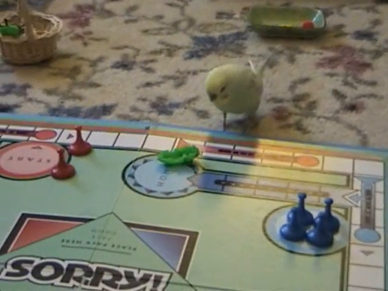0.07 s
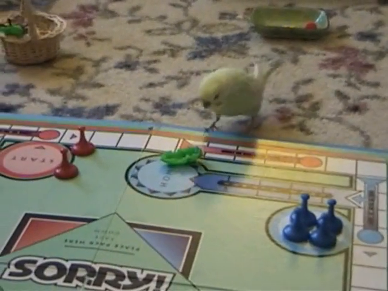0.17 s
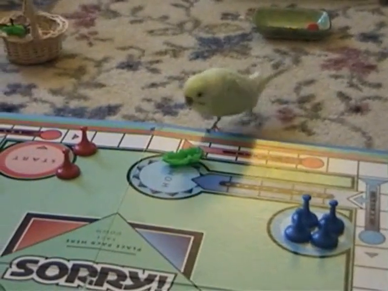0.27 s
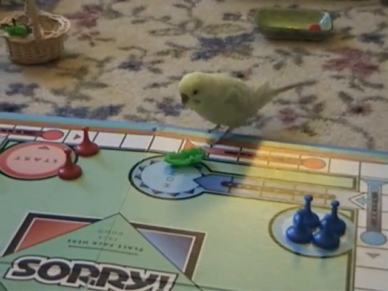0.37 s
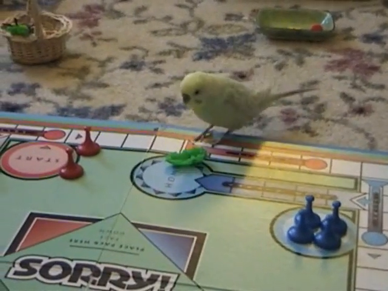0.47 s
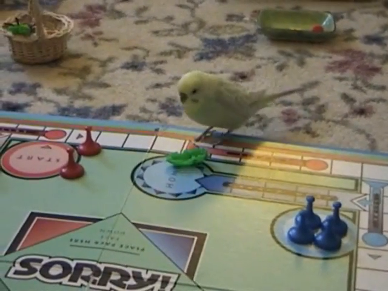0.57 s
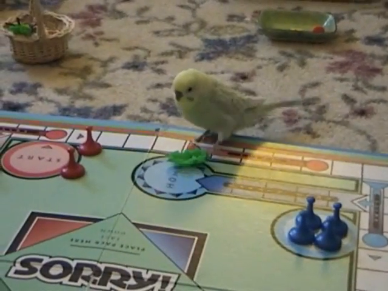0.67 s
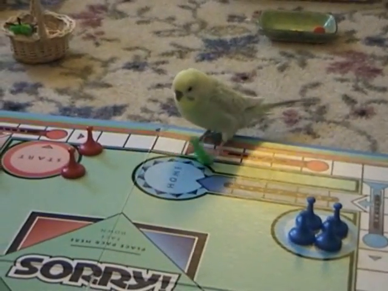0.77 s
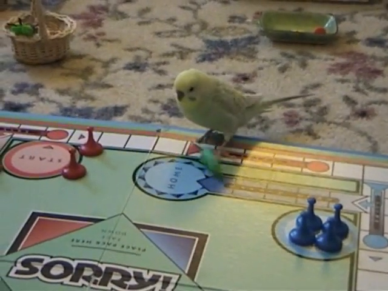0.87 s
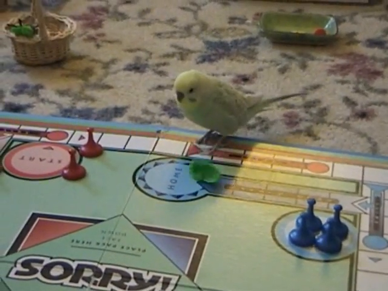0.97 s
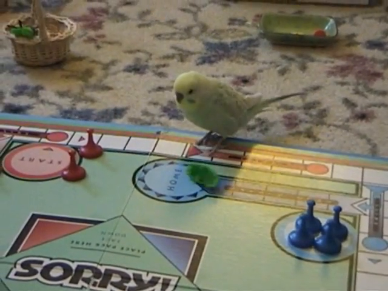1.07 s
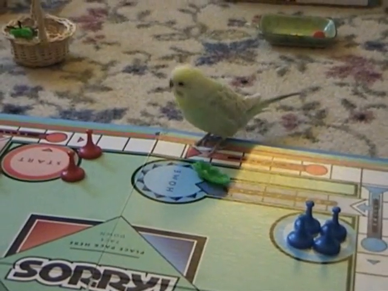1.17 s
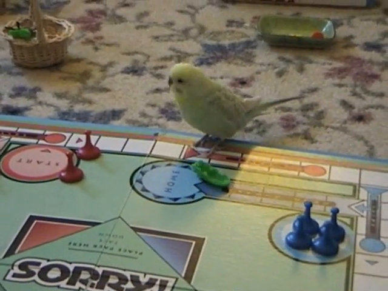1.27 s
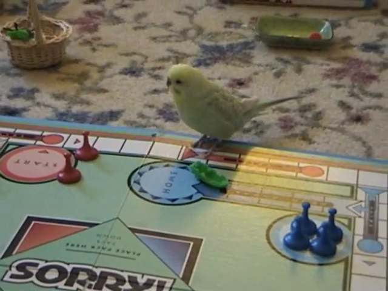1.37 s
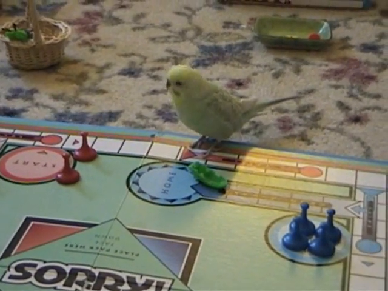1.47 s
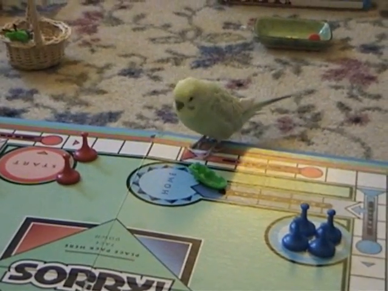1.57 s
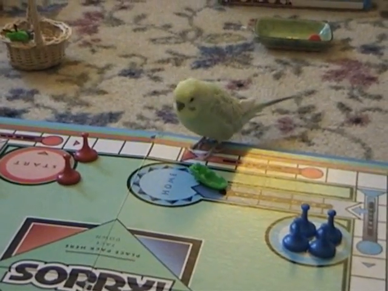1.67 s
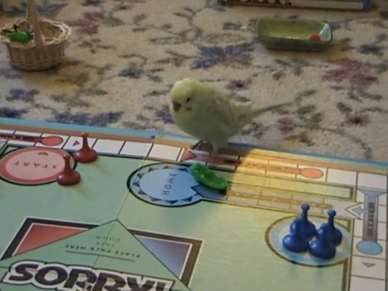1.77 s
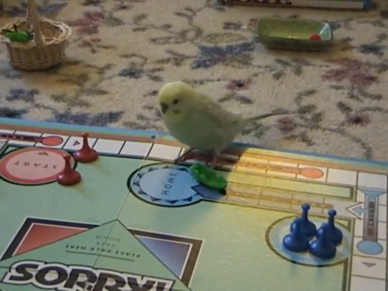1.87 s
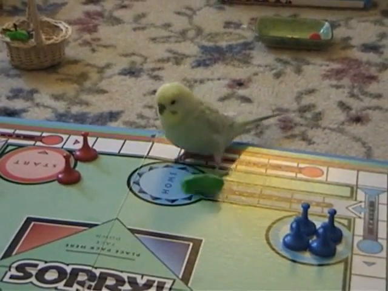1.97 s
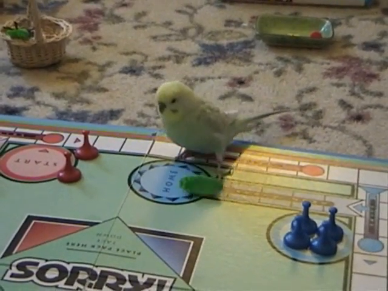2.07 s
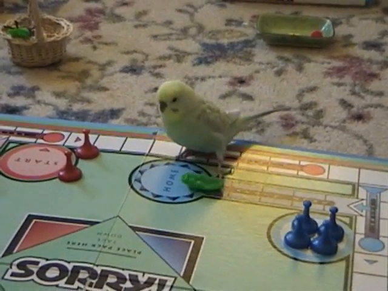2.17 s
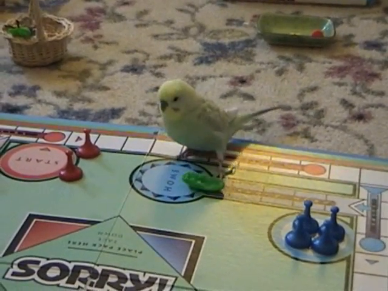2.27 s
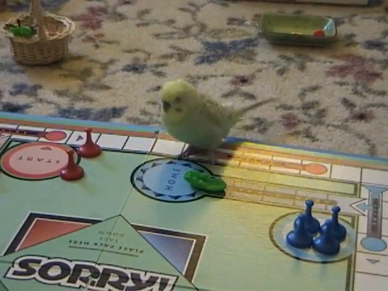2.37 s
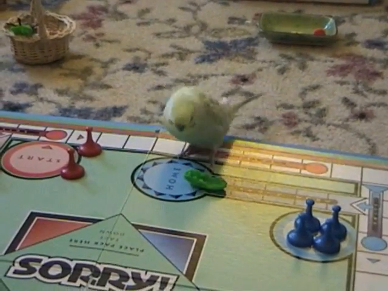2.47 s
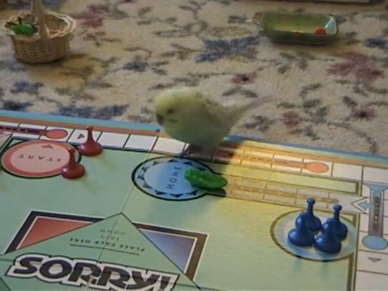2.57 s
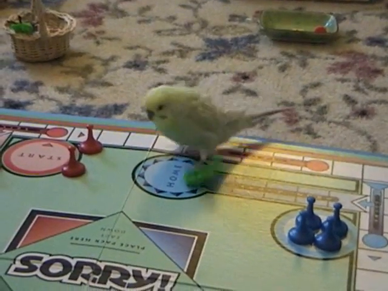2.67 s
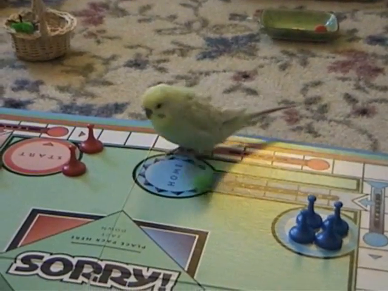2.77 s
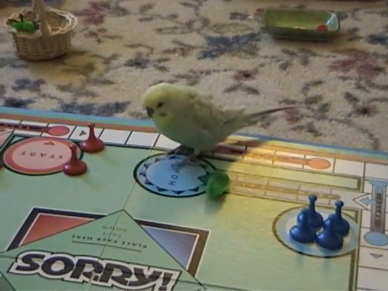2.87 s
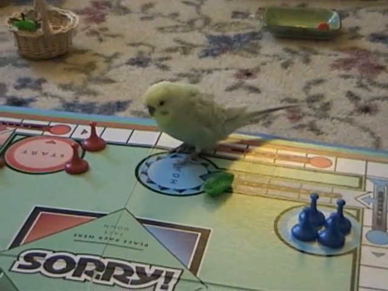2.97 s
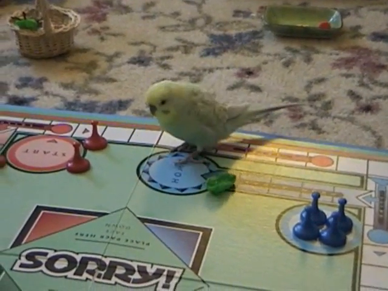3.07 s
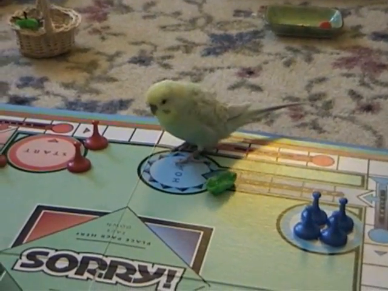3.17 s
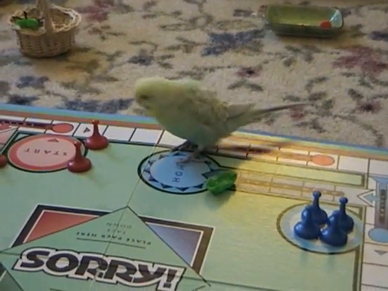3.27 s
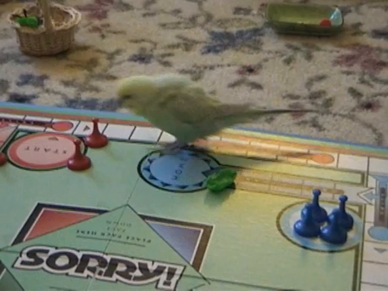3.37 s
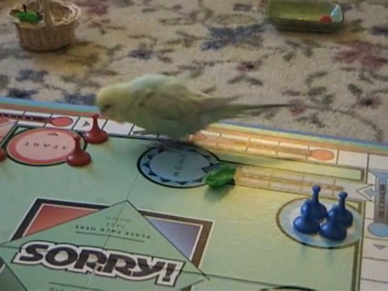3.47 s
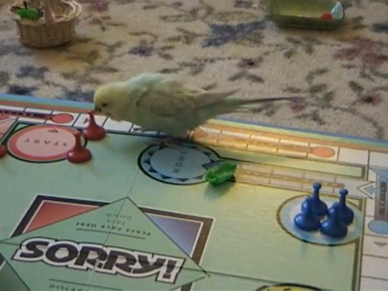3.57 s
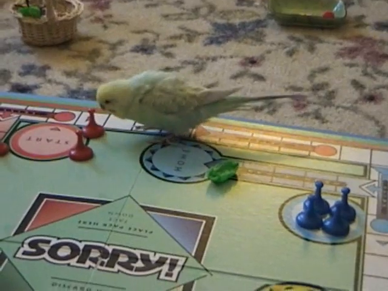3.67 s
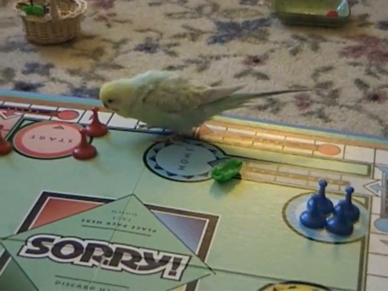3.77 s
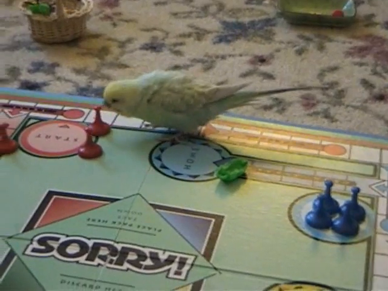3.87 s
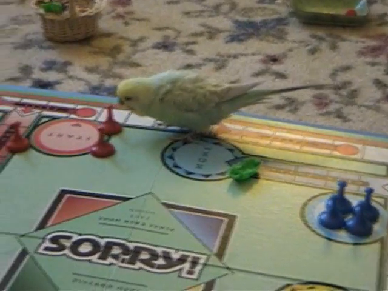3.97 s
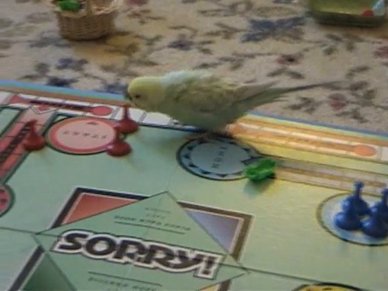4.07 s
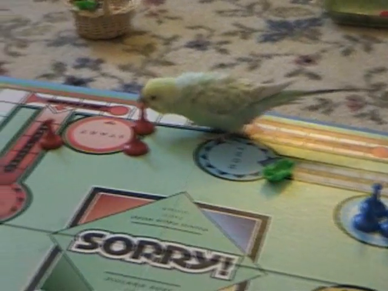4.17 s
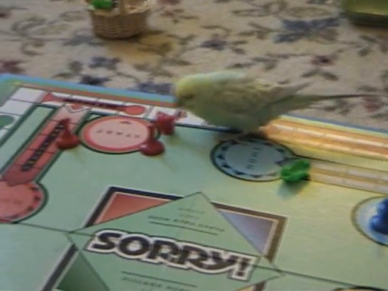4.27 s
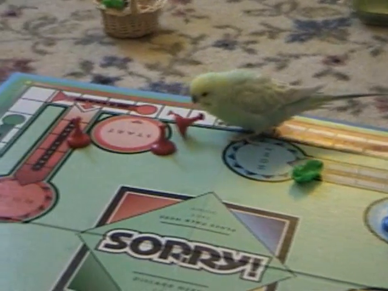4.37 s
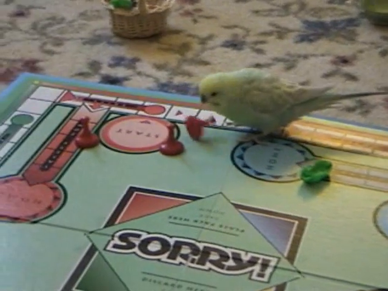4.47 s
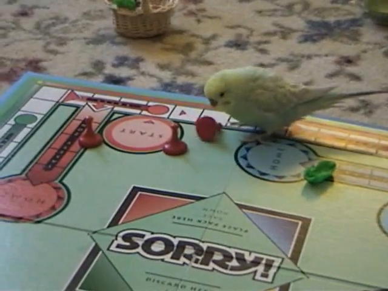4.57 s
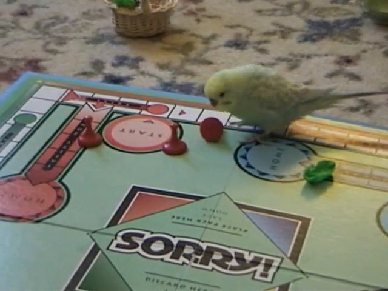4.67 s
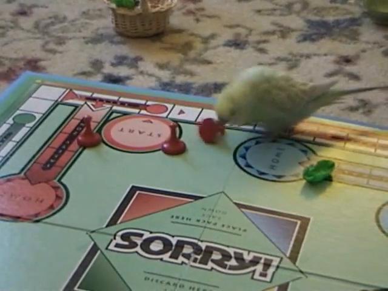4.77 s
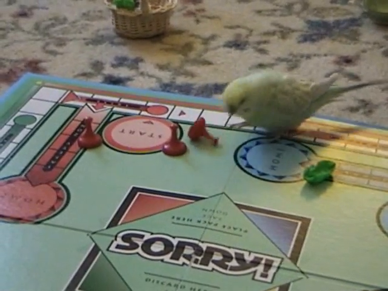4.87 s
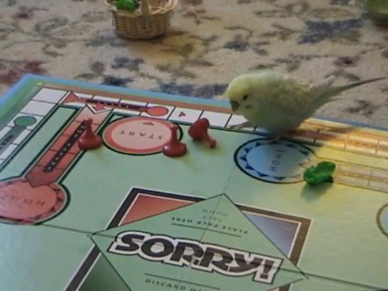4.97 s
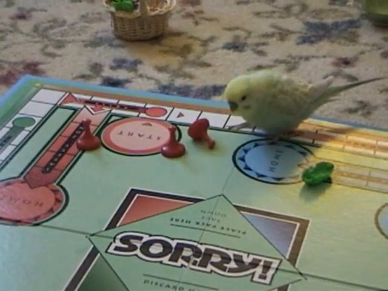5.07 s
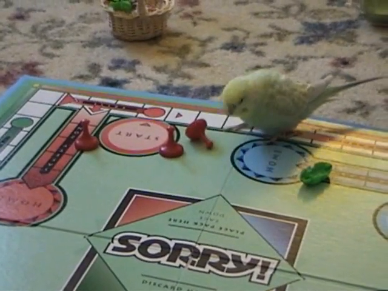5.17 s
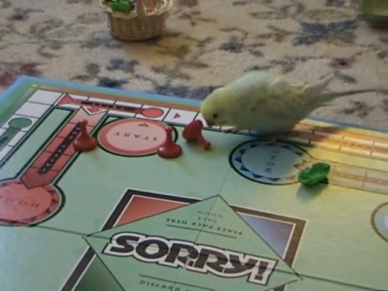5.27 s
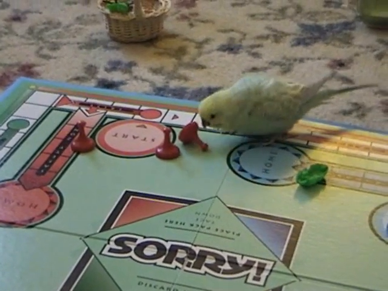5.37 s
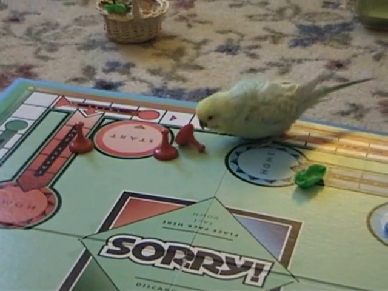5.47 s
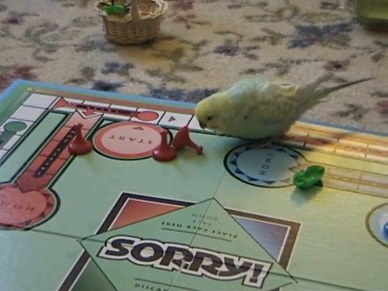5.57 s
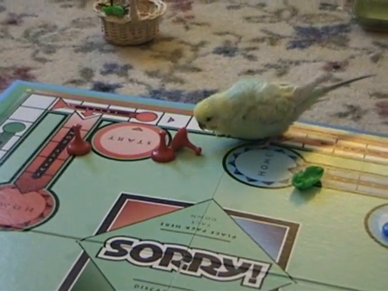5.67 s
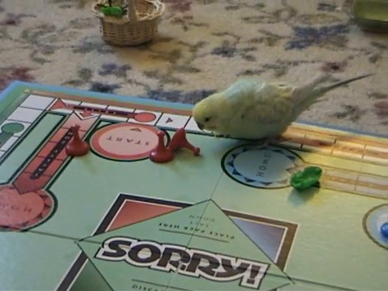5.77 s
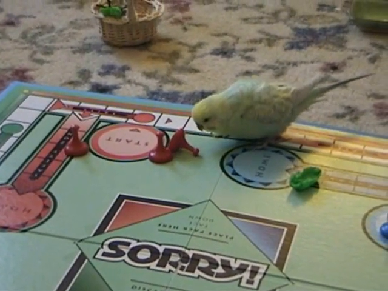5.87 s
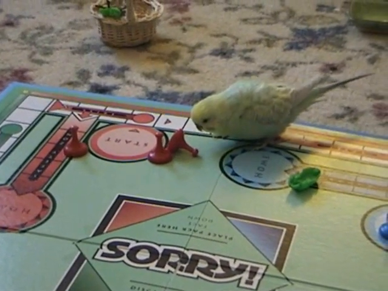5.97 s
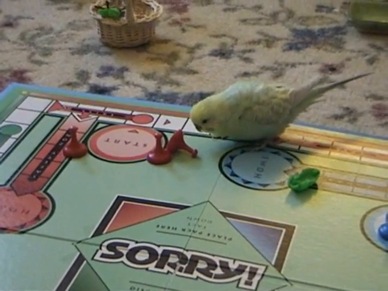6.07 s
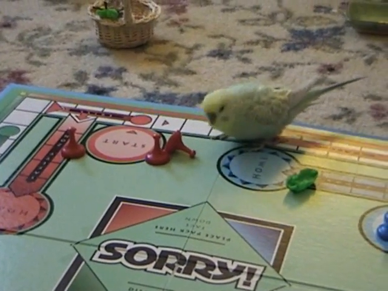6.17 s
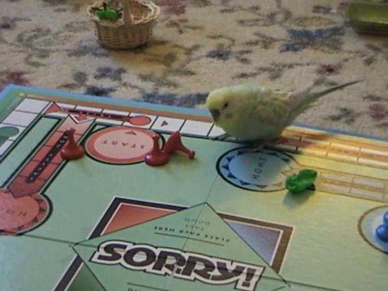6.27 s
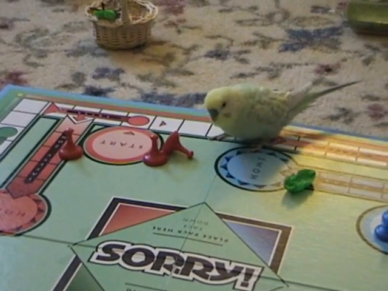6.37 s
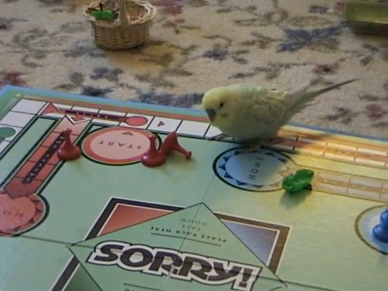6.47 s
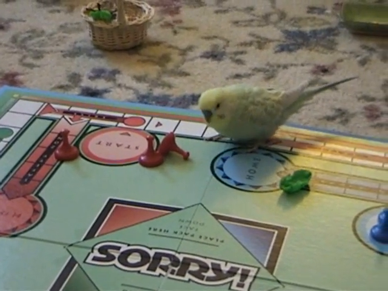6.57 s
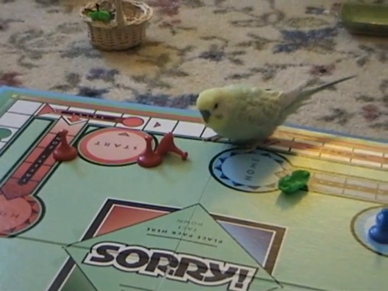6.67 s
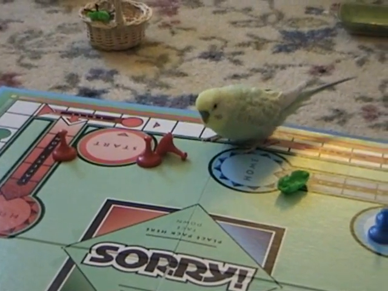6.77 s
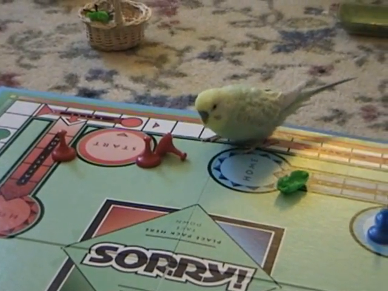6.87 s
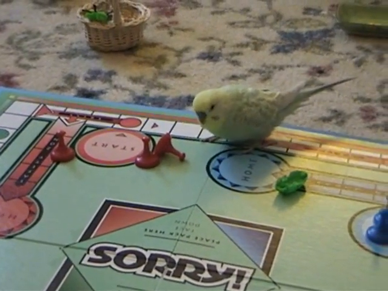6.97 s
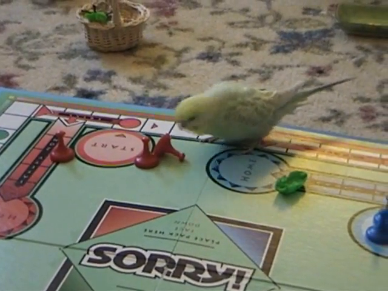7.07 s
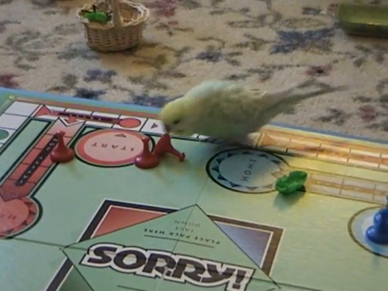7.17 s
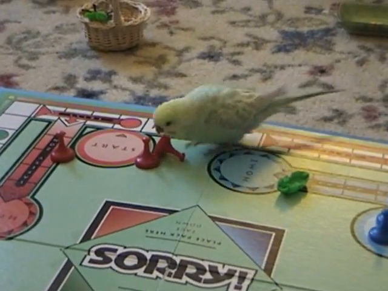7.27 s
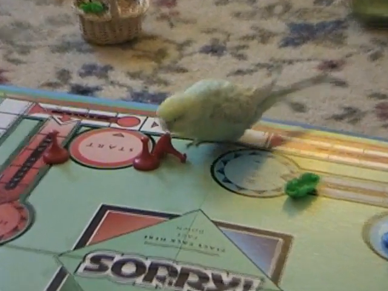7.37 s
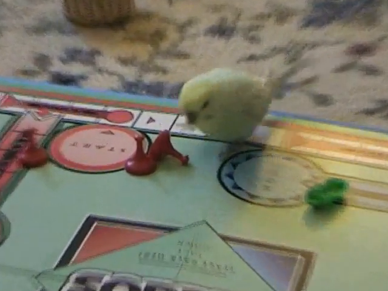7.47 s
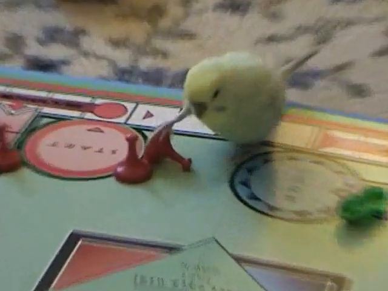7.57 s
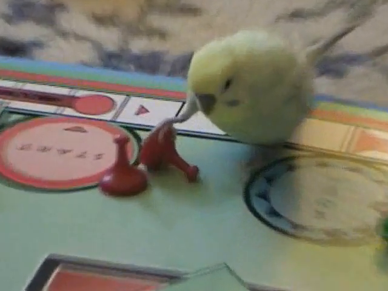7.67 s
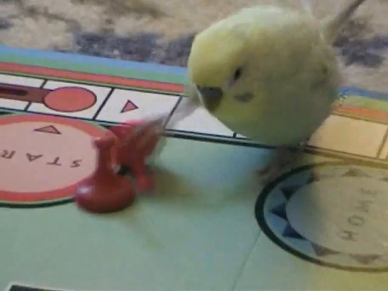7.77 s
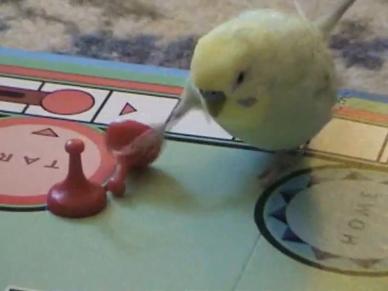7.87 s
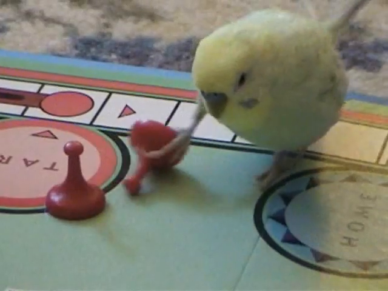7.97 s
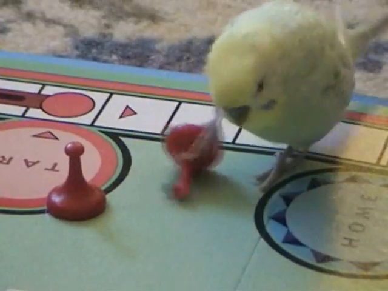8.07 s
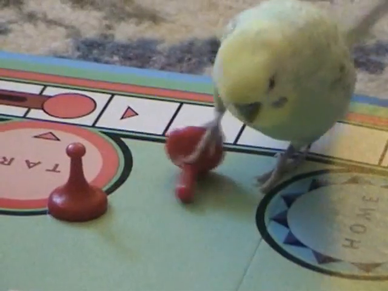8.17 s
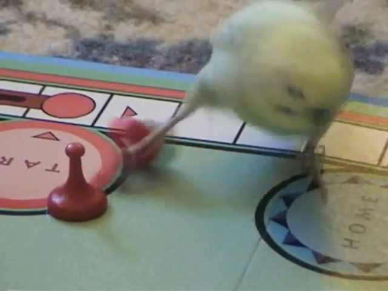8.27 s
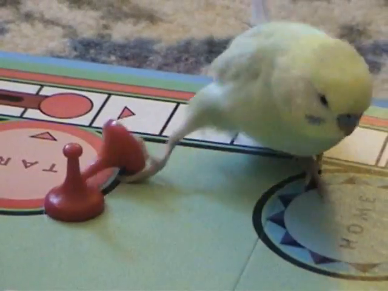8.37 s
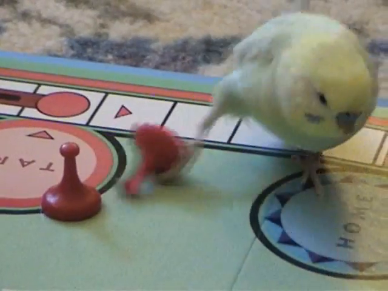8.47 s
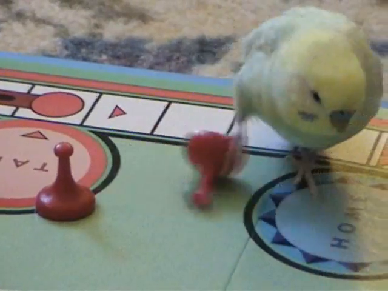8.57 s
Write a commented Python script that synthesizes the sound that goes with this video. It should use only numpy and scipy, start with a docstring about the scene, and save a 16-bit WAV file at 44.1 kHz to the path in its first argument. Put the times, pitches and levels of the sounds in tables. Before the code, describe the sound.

Indoors, a small bird chatters in short whistled flourishes and buzzy scolds during the first four seconds while hollow plastic pawns tap and scuff a thin board on carpet. One sharp clack follows, then sparse faint sliding, and near the end a flurry of clicks with a pawn wobbling on its rim. The handheld microphone picks up steady hum, hiss, a shell knock and faint low bumps.

```python
"""Camcorder hum (summed sines) and hiss (shaped noise) run throughout, with a small carpeted room's brief answer.
A budgie warbles from 0.3 s (gliding sines with overtones) and rasps from 0.6 s (pulsed noise), amid faint hisses.
From 0.8 s light plastic pieces slide and knock on a cardboard game board (decaying modes, hails of tiny contacts).
Dry snaps follow from 2 s; at 3.5 s claws scrape (noise swells) and the camcorder's shell is knocked (modes).
Near 8 s a pawn rocks on its rim (one mode), then low bumps (short sines) as a hand shifts on the camcorder."""
import sys
import numpy as np
from scipy import signal
from scipy.fft import rfft, irfft, next_fast_len
from scipy.io import wavfile
from scipy.ndimage import uniform_filter1d, map_coordinates

SR = 44100
rng = np.random.default_rng(int(sys.argv[2]) if len(sys.argv) > 2 else 0)


def pcm_store(signal):
    """Save signal as 16-bit PCM."""
    levels = np.round(np.clip(np.atleast_2d(signal), -1, 1) * 32767)
    wavfile.write(sys.argv[1], SR, levels.astype(np.int16).T)


N = 380583

# camcorder hum: field_rate_multiple, rms_db
HUM = [(1, -86), (2, -49.5), (3, -45.5), (4, -51), (5, -53.5), (7, -70), (10, -63), (12, -65.5)]
FIELD_RATE_HZ, HUM_LAG_RAD = 59.94, 0.17
# camcorder drive tones: pitch_hz, rms_db, deviation_hz
DRIVE_TONES = [(47.6, -62, .3), (313.6, -54.5, 3.98), (805, -61, 5), (1569, -62, 10), (4744, -57.5, 55),
               (5510, -61, 46), (6750, -61.5, 52)]
# hiss spectrum: freq_hz, relative_db
HISS_SHAPE = [(20, -34), (45, -21), (70, -12), (104, -18), (181, -1), (250, -4.5), (320, -10.5), (400, -13),
              (650, -13.5), (850, -11.5), (1500, -14), (2700, -17.5), (4700, -16.5), (6600, -19.5),
              (8500, -24.5), (10000, -32), (13600, -36.5), (15600, -63)]
# hiss, left-right correlation: freq_hz, correlation (-1 to 1)
HISS_LIKENESS = [(60, 1), (330, 0.72), (500, 0.68), (950, 0.81), (1300, 0.33), (2400, 0.64), (6000, 0.94),
                 (8000, 0.71), (10000, 0.33), (14000, 0.26)]
# a hand shifts on the camcorder: middle_s, pitch_hz, rms_db, half_length_s
BUMPS = [(8.355, 105, -42, .022), (8.37, 55, -48, .035), (8.56, 50, -53, .05)]

# long warble glides, one list each: time_s, pitch_hz, level_db
GLIDES = [
    [(.263, 4800, -38), (.27, 5200, -30), (.28, 6000, -30), (.29, 5200, -39), (.301, 4400, -30),
     (.31, 4200, -40), (.318, 4310, -36), (.325, 4160, -43), (.335, 3510, -40), (.348, 2714, -30.5),
     (.358, 2540, -31), (.367, 2870, -34), (.375, 2170, -25), (.387, 1995, -22.5), (.392, 1330, -31),
     (.4, 1440, -29)],
    [(1.742, 1440, -38), (1.75, 1400, -33), (1.762, 1320, -38), (1.772, 1067, -37), (1.782, 1203, -35),
     (1.792, 1427, -35), (1.802, 1230, -34), (1.812, 1060, -35), (1.817, 930, -38)],
    [(2.588, 6270, -42), (2.595, 5770, -30), (2.6, 5680, -27), (2.612, 5040, -34), (2.622, 4750, -38),
     (2.645, 4220, -42), (2.7, 3700, -39)],
    [(3.603, 3135, -29), (3.613, 3790, -42), (3.626, 3510, -35), (3.643, 2894, -31.5), (3.651, 2390, -34),
     (3.657, 2940, -30), (3.665, 3160, -36), (3.67, 1450, -29), (3.674, 1330, -32), (3.679, 1490, -31)],
]
# overtone strength of each glide: relative_db
GLIDE_OVERTONE_DB = [0.5, -9.5, -12, -18]
# short whistled strokes, some of them a glide's overtone sounding alone:
# start_s, length_s, first_hz, middle_hz, last_hz, middle_level_db, overtone_relative_db
STROKES = [(0.282, 0.051, 5500, 5560, 5350, -30.5, -20), (2.593, 0.032, 12000, 11100, 8600, -47, -40),
           (0.406, 0.015, 1720, 1135, 1370, -29, 5.5), (0.414, 0.008, 1700, 2000, 2300, -28, -10),
           (0.437, 0.011, 2320, 2150, 2520, -22, -6), (0.448, 0.01, 2440, 1620, 2410, -27, 7),
           (0.455, 0.014, 2430, 2390, 2430, -26, -9), (0.468, 0.011, 2420, 2600, 2560, -28, -9),
           (0.479, 0.012, 2620, 1850, 2670, -28.5, 16), (1.637, 0.024, 885, 880, 948, -39.5, -7),
           (1.663, 0.022, 1010, 1150, 1070, -35.5, -12), (1.685, 0.022, 1076, 1106, 980, -35, -6),
           (1.703, 0.017, 2120, 1740, 1300, -37, -10), (1.711, 0.026, 1020, 1315, 1230, -32, -9),
           (2.646, 0.037, 7260, 7300, 7140, -34.5, -20), (2.686, 0.018, 2130, 1970, 2620, -28.5, -5),
           (2.708, .011, 1130, 1270, 1560, -28.5, 1), (2.719, 0.0065, 7000, 6700, 6450, -37, -20),
           (2.728, 0.016, 2620, 2410, 2460, -27, -20), (2.754, .011, 4700, 4800, 4600, -29, -7),
           (3.487, 0.05, 1116, 1016, 1240, -37, -7), (3.526, 0.01, 1350, 1420, 1400, -33, -8),
           (3.59, 0.018, 960, 1436, 1150, -27, -1), (3.592, .006, 3200, 3450, 3700, -37, -20),
           (3.765, .012, 900, 1100, 950, -36, -20), (3.687, .03, 1410, 1450, 1400, -40, -20),
           (3.608, 0.021, 1240, 1340, 1300, -39, -20), (3.681, 0.013, 3600, 3440, 2900, -36, -20),
           (3.696, 0.0161, 2450, 2390, 2200, -33, -20), (3.71, .012, 2220, 2080, 2450, -30.5, -20),
           (3.732, 0.011, 3270, 3150, 3080, -39, -20), (7.608, 0.02, 1320, 1367, 1490, -39.5, -20),
           (7.68, 0.016, 2110, 2100, 2020, -41, -20)]
# overtone against whistle pitch: pitch_hz, relative_db
OVERTONE_BY_PITCH = [(900, 1), (1450, -6), (1900, -28), (2780, -28), (3000, -1), (3800, 7), (4400, -2),
                     (5400, -25)]
HOARSE_HZ, HOARSE_WIDTH_HZ = 4510, 1100  # hoarsest pitch, on top of a rise with pitch
STROKE_EDGE_DROP_DB = 5.5

# room decay: freq_hz, t60_s
ROOM_DECAY = [(300, 0.063), (1000, 0.17), (3000, 0.27), (6000, 0.21), (10000, 0.24)]
# strength of the room's answer: freq_hz, gain_db
ROOM_STRENGTH = [(300, -3.5), (1000, -1), (2500, -8.5), (4000, -4.5), (5600, -7.5), (8000, -10),
                 (12000, -5)]
# whistles stir the room less when low: freq_hz, gain_db
WHISTLE_SEND = [(1500, -6), (3500, 1)]

# faint short hisses: middle_s, centre_hz, level_db, half_length_s
PUFFS = [(.606, 5500, -36, 0.024), (3.568, 3700, -33.5, 0.0027), (2.818, 6100, -37, 0.026),
         (2.825, 3800, -42, 0.032), (3.14, 8040, -45, 0.037), (4.58, 7800, -47, 0.032),
         (5.05, 3020, -47, 0.045), (5.29, 7400, -48, .03), (5.51, 5500, -45, .02),
         (5.573, 8050, -46, 0.035), (5.9, 7200, -44.5, 0.02), (6.1, 5000, -48, 0.049),
         (6.63, 7300, -48, 0.036), (6.99, 6100, -45, 0.027), (7.685, 7340, -46, .04),
         (7.96, 11700, -48, 0.032), (.365, 5400, -40, 0.022), (.4, 4070, -41, 0.039),
         (.445, 3880, -40.5, 0.034)]

# rasps: start_s, rise_s, hold_s, fall_s, first_pulses_per_s, last_pulses_per_s,
# bright_level_db, low_level_db, low_centre_hz, bright_peak_hz
RASPS = [(0.5553, 0.012, 0.018, 0.006, 206, 173, -20.5, -28, 1720, 5800),
         (1.8244, 0.026, 0.019, 0.011, 186, 165, -29, -31, 1190, 5630),
         (2.7612, 0.019, 0.0072, 0.026, 221.7, 167, -10.5, -19.5, 2430, 6060)]
# rasp, bright part: multiple_of_peak, relative_db
RASP_BRIGHT_SHAPE = [(.47, -22), (.63, -18), (.8, -10.5), (.9, -8.5), (1, 1), (1.1, -5), (1.22, -11.5),
                     (1.4, -12), (1.75, -39.5), (2.14, -40), (2.54, -46)]
# rasp, low part: multiple_of_centre, relative_db
RASP_LOW_SHAPE = [(.3, -32), (.6, -32), (.8, -2), (1.05, 1), (1.35, -5), (1.7, -2.5), (2.3, -7), (3.2, -42)]
RASP_RISE_DB, RASP_FALL_DB, LOW_SWING = 19, 32, 0.47  # bright-part swing; share of it in the low part
PULSE_DEPTH, PULSE_DEPTH_END = 2.6, 1.7  # pulses blur towards the end
RASP_LOW_CUT_HZ = 650  # rasps are cut low, below about this frequency

# pieces sliding: middle_s, length_s, level_db
SLIDES = [(1.0, 0.48, -47), (1.322, 0.23, -45), (2.253, 0.39, -47.5), (3.085, 0.46, -48.5),
          (3.58, 0.35, -45), (4.304, 0.17, -48.5), (4.962, 0.4, -49), (6.0, 0.72, -58.5), (7.72, 0.99, -54),
          (8.421, 0.64, -51.5)]
# pieces striking the board: listed_s, level_db, board_pitch_hz, thud_relative_db, click_relative_db
TAPS = [(0.8957, -18.5, 1030, -12, -12), (0.8981, -25, 1070, -19, -8), (0.91, -31, 1190, -20, -17),
        (0.984, -31, 875, -10, -14), (1.024, -21, 999, -10, -21), (1.036, -18.5, 900, -12, -18),
        (1.0393, -23, 900, -12, -18), (1.052, -26, 751, -10, -13), (1.112, -15.5, 850, -11.5, -15),
        (1.122, -16, 1040, -15, -11), (1.142, -14.5, 900, -22, -11), (1.156, -25, 1220, -8, -16),
        (1.248, -23.5, 825, -11, -7.5), (1.261, -21.5, 877, -12, -22), (1.314, -18, 910, -12.5, -15),
        (1.329, -24, 939, -12, -18), (1.369, -27, 900, -10, -16), (1.361, -21, 870, -15, -17),
        (1.991, -22, 1100, -15, -12), (2.119, -30, 813, -4.5, -16), (2.224, -18, 850, -12.5, -25),
        (2.236, -28, 970, -6, -19), (2.302, -16.5, 880, -14, -27), (2.323, -22, 844, -15, -26),
        (2.341, -24, 856, -13, -23), (2.837, -13.5, 900, -25, -16), (2.85, -24, 964, -19, -15),
        (2.896, -26, 826, -6, -19), (2.912, -21, 980, -13, -20), (2.934, -24, 1050, -11, -18),
        (2.9498, -24, 900, -9, -14), (2.9767, -25, 1050, -22, -24), (2.964, -12.5, 1080, -15.5, -21),
        (2.9804, -15, 1080, -25, -12.5), (2.9977, -19, 1220, -13, -21), (3.033, -18, 1010, -17, -30),
        (3.049, -21.5, 867, -9, -26), (3.064, -22, 990, -13, -24), (3.088, -22.5, 830, -9, -13),
        (3.121, -21.5, 1030, -16, -26), (3.446, -29, 1130, -24, -8), (3.757, -19, 1070, -19, -10),
        (3.996, -23, 940, -26, -26), (4.01, -43, 1070, -12, -8), (4.03, -16, 1090, -33, -12),
        (4.043, -22, 1180, -21, -29), (4.059, -36, 1090, -20, -14), (4.341, -27, 1030, -24, -14),
        (4.665, -11, 860, -24, -4), (4.6672, -25, 910, -24, -8), (4.684, -25, 905, -16, -1),
        (4.885, -29.5, 1010, -22, -4), (4.956, -24, 940, -13, -16), (5.756, -27, 890, -25, -10),
        (7.557, -27.5, 956, -16, -16), (7.9445, -16.5, 930, -22, -26), (7.9493, -21, 950, -22, -8),
        (7.9527, -21, 905, -22, -21), (7.963, -22, 990, -20, -8), (7.965, -20, 1150, -26, -8),
        (7.979, -25, 1040, -19, -19), (8.424, -28, 970, -18, -8), (8.457, -27, 1070, -25, -14)]
# board modes: multiple_of_pitch, relative_db, t60_s
BOARD_MODES = [(.6, -22, 0.012), (.8, -11, 0.01), (1, -6.5, 0.022), (1.1, 4, 0.008), (1.45, 0, 0.006),
               (2.1, -13, 0.008)]
# board on carpet, modes: freq_hz, relative_db, t60_s
THUD_MODES = [(275, -1, 0.033), (335, 2.5, 0.036), (470, -13, 0.014)]
# hard plastic, modes: freq_hz, relative_db, t60_s
CLICK_MODES = [(1900, -4, 0.005), (2400, 4.5, 0.005), (2950, 5.5, 0.005), (3630, -4, 0.004)]
BOARD_HZ, BOARD_SPOTS = 952, 8  # usual board pitch; places on it, each with its own ring
CONTACTS_PER_S = 350
RATTLE_DB, RATTLE_T60_S = -33, 0.45  # a struck piece goes on rocking: level relative to the blow
TAP_LAG_S = 0.00121283  # each blow sounds about a millisecond after its listed time
THUD_LAG_S = 0.0019  # board meets carpet just after the blow
MODE_SCATTER_DB = 1.5  # chance in each mode's strength

# dry snaps, perhaps the beak: listed_s, level_db, left_minus_right_db
SNAPS = [(1.993, -40, 0.0), (2.1183, -37, 0.5), (3.5296, -28.5, 1.5), (3.5665, -29, 3), (4.88, -41, -1.0),
         (7.9453, -27, 0.5)]
# snap modes: freq_hz, relative_db, t60_s
SNAP_MODES = [(3640, -6, 0.0048), (6600, -6, 0.0066), (8640, 1.5, 0.0043), (9940, -8, 0.0032),
              (11450, -5, 0.0035), (13700, -20, .004)]
SNAP_LAG_S = 0.0009621  # each snap sounds this long after its listed time
# claws scraping the board: middle_s, centre_hz, level_db, half_length_s
SCRAPES = [(3.538, 1500, -33, 0.014), (4.697, 1750, -37, 0.014), (7.941, 990, -35, 0.006),
           (7.967, 1950, -33, 0.0075), (8.45, 2500, -44.5, 0.029), (8.21, 899, -41, 0.016),
           (8.245, 1190, -46, 0.026), (8.41, 1090, -45, 0.025), (8.433, 960, -38, 0.013),
           (8.46, 1515, -45, 0.043), (8.48, 990, -39.5, 0.012)]
# knocks on the camcorder's shell: listed_s, level_db
KNOCKS = [(3.537, -28), (3.54, -29), (3.552, -14.5), (3.558, -24), (3.574, -30)]
# shell modes: freq_hz, relative_db, t60_s
SHELL_MODES = [(484, -6.5, 0.095), (800, 1.5, 0.017), (950, 4, 0.019), (1160, 2, 0.015), (1430, -14, 0.02),
               (2200, -7, 0.011)]
KNOCK_LAG_S = 0.00152  # each knock sounds this long after its listed time
# a hollow pawn rocking on its rim: contact_s, level_db
PAWN_ROCKS = [(8.041, -29.5), (8.046, -36), (8.055, -30), (8.059, -30.5), (8.065, -35), (8.075, -42),
              (8.086, -39)]
PAWN_HZ, PAWN_T60_S = 880, 0.04

# the two microphone ports, level: freq_hz, left_minus_right_db
PORT_LEVEL = [(60, -6), (200, -0.9), (330, 0), (500, 1), (700, 5.5), (950, 4), (1300, 2.5), (2300, -1),
              (3300, -1), (6000, -0.5), (10000, 0.5), (15000, 0)]
# the two ports, phase: freq_hz, left_lead_rad
PORT_PHASE = [(60, 0.4), (500, 0.51), (700, 0.85), (1000, -0.46), (1700, -0.5), (2400, 0.77), (8000, 0.51),
              (15000, 1)]
BAND_LIMIT_HZ, CEILING = 16000, 0.75  # ceiling in full-scale units


def amp(db):
    """Decibels to amplitude."""
    return 10 ** (np.asarray(db) / 20)


def unit(x):
    """Scale to an rms of 1."""
    return x / np.sqrt(np.mean(x ** 2) + 1e-20)


def along(points, hz):
    """Interpolate (Hz, value) points on a log frequency axis."""
    f, v = np.transpose(points)
    return np.interp(np.log(hz + 1), np.log(f + 1), v)


def wobble(knots_per_s):
    """A smooth random curve through normal knots."""
    knots = rng.standard_normal(int(N * knots_per_s / SR) + 4)
    return map_coordinates(knots, [np.arange(N) * knots_per_s / SR])


def filtered(x, response):
    """Multiply the spectrum by a function of frequency."""
    m = next_fast_len(x.shape[-1] + 8192)
    return irfft(rfft(x, m) * response(np.fft.rfftfreq(m, 1 / SR)), m)[..., :x.shape[-1]]


def add(track, start_s, sound):
    """Mix a sound into a track in place."""
    part = track[..., round(start_s * SR):][..., :sound.shape[-1]]
    part += sound[..., :part.shape[-1]]


def span(rows):
    """Start time, then each column interpolated per sample."""
    s, *columns = np.transpose(rows)
    t = s[0] + np.arange(round((s[-1] - s[0]) * SR)) / SR
    return [s[0]] + [np.interp(t, s, column) for column in columns]


def swells(table, relative_width):
    """Short Hann swells of band noise."""
    out = np.zeros(N)
    for middle_s, centre_hz, db, half_s in table:
        band = lambda hz: np.exp(-((hz / centre_hz - 1) / relative_width) ** 2)
        air = filtered(rng.standard_normal(SR // 8), band)
        swell = np.hanning(round(2 * half_s * SR))
        add(out, middle_s - half_s, amp(db) * swell * unit(air[:len(swell)]))
    return out


def ring(modes, contact_s=0.00049, detune=0.086):
    """One blow, peak 1: decaying modes, each with chance in strength and pitch; longer contact softens it."""
    t = np.arange(SR // 16) / SR
    hz, db, t60_s = np.transpose(modes)[..., None]
    strength_luck, pitch_luck = rng.standard_normal((2, len(modes), 1))
    decay = amp(db + MODE_SCATTER_DB * strength_luck - 60 * t / t60_s)
    x = np.sum(decay * np.sin(2 * np.pi * hz * (1 + detune * pitch_luck) * t), axis=0)
    x = x * (1 - np.exp(-t / max(contact_s, 1e-5)))
    return x / np.abs(x).max()


def camcorder_hum():
    """Field-rate harmonics, phase-lagged into one smeared pulse a field, each level wavering slightly."""
    t = np.arange(N) / SR
    out = np.zeros(N)
    for k, db in HUM:
        phase = 2 * np.pi * k * FIELD_RATE_HZ * t - HUM_LAG_RAD * (k - 2) ** 3
        out += amp(db + 0.59 * wobble(5.0)) * np.cos(phase)
    return np.sqrt(2) * out


def camcorder_drive():
    """Drive tones as sines whose frequency wavers at random."""
    t = np.arange(N) / SR
    out = np.zeros(N)
    for hz, db, deviation_hz in DRIVE_TONES:
        drift = np.cumsum(deviation_hz * wobble(30 + deviation_hz)) / SR
        out += amp(db) * np.sin(2 * np.pi * (hz * t + drift))
    return np.sqrt(2) * out


def camcorder_hiss():
    """Coloured noise flickering in time and frequency; a mid-side mix sets the left-right correlation."""
    z = signal.stft(rng.standard_normal((2, N)), nperseg=512)[2]
    flicker = uniform_filter1d(rng.standard_normal(z.shape[1:]), size=8, axis=0)
    flicker = uniform_filter1d(flicker, size=8, axis=1)
    pair = signal.istft(z * amp(1.54 * unit(flicker)), nperseg=512)[1][:, :N]

    def mid_side(hz):
        turn = np.arccos(np.clip(along(HISS_LIKENESS, hz), -1, 1)) / 2
        return amp(along(HISS_SHAPE, hz)) * np.array([np.cos(turn), np.sin(turn)])

    mid, side = filtered(pair, mid_side)
    return amp(-41) * unit(np.array([mid + side, mid - side]))


def warble():
    """Gliding whistle with an octave overtone; random pitch and level make it hoarser with pitch,
    most of all near 4.5 kHz."""
    out, flutter, tremble = np.zeros(N), wobble(500), wobble(600)
    strokes = []
    for s, length, first, middle, last, db, _ in STROKES:
        edge_db = db - STROKE_EDGE_DROP_DB
        strokes.append([(s, first, edge_db), (s + length / 2, middle, db), (s + length, last, edge_db)])
    overtones_db = GLIDE_OVERTONE_DB + [row[-1] for row in STROKES]
    for note, strength_db in zip(GLIDES + strokes, overtones_db):
        s, hz, db = span(note)
        overtone = amp(strength_db + along(OVERTONE_BY_PITCH, hz))
        hoarse = 0.52 * np.clip(hz / 6500, 0, 1) ** 2
        hoarse = hoarse + 0.56 * np.exp(-((hz - HOARSE_HZ) / HOARSE_WIDTH_HZ) ** 2)
        at = slice(round(s * SR), round(s * SR) + len(hz))
        pitch_hz = uniform_filter1d(hz, size=40) + 300 * hoarse * tremble[at]
        phase = 2 * np.pi * np.cumsum(pitch_hz) / SR
        grain = amp((0.8 + 4 * hoarse) * flutter[at])
        fade = signal.windows.tukey(len(hz), min(1, 0.00066 * SR / len(hz)))
        add(out, s, fade * amp(db) * grain * (np.sin(phase) + overtone * np.sin(2 * phase)))
    return out


def room(x):
    """Noise tails whose decay time depends on frequency; a new tail every quarter second."""
    out, step = np.zeros((2, N)), SR // 4
    for k in range(0, N, step):
        hz, t, z = signal.stft(rng.standard_normal((2, SR // 3)), SR, nperseg=256)
        decay = amp(-60 * t / along(ROOM_DECAY, hz)[:, None])
        mid, side = signal.istft(z * decay, SR, nperseg=256)[1]
        tail = 1.1 * mid + 0.34 * side * np.array([[1], [-1]])  # the two ports hear much the same echoes
        tail = tail / np.linalg.norm(tail[0])
        add(out, k / SR + 0.006, signal.fftconvolve(x[None, k:k + step], tail, axes=1))
    return out


def puffs():
    """Faint short hisses: narrow-band noise swells."""
    return swells(PUFFS, relative_width=0.18)


def breath(shape, centre_hz, size):
    """Noise coloured around a centre, its strength evened from moment to moment."""
    colour = [(multiple * centre_hz, db) for multiple, db in shape]
    air = filtered(rng.standard_normal(size + 2000), lambda hz: amp(along(colour, hz)))
    strength = np.sqrt(np.abs(uniform_filter1d(air ** 2, size=36)) + 1e-20)
    return (air / strength)[1000:-1000]


def rasps():
    """The voice breaks into noise bursts, one per pulse of air; the low part swells less than the bright."""
    out = np.zeros(N)
    for s, rise, hold, fall, first, last, bright_db, low_db, centre_hz, peak_hz in RASPS:
        _, effort_db = span([(s, -RASP_RISE_DB), (s + rise, 0), (s + rise + hold, 0),
                             (s + rise + hold + fall, -RASP_FALL_DB)])
        size = len(effort_db)
        rate, depth = np.linspace([first, PULSE_DEPTH], [last, PULSE_DEPTH_END], size).T
        gate = 0.23 + np.exp(depth * (np.cos(2 * np.pi * np.cumsum(rate) / SR) - 1))
        gate = gate * signal.windows.tukey(size, 0.15)
        bright = amp(bright_db + effort_db) * breath(RASP_BRIGHT_SHAPE, peak_hz, size)
        low = amp(low_db + LOW_SWING * effort_db) * breath(RASP_LOW_SHAPE, centre_hz, size)
        add(out, s, gate * (bright + low))
    return filtered(out, lambda hz: hz ** 4 / (hz ** 4 + RASP_LOW_CUT_HZ ** 4))


def board(pitch_hz):
    """Board modes at a spot of this pitch."""
    return [(k * pitch_hz, db, t60_s) for k, db, t60_s in BOARD_MODES]


def slides_and_rattle():
    """Sliding, and rocking after each blow: a random hail of tiny contacts over several board spots."""
    power, t = np.zeros(N), np.arange(SR // 2) / SR
    for s, length_s, db in SLIDES:
        add(power, s - length_s / 2, amp(db) ** 2 * signal.windows.tukey(round(length_s * SR), 0.6))
    for s, db, *_ in TAPS:
        add(power, s, amp(db + RATTLE_DB - 60 * t / RATTLE_T60_S) ** 2)
    hits = rng.random((BOARD_SPOTS, N)) < CONTACTS_PER_S / BOARD_SPOTS / SR
    hail = hits * amp(6.0 * rng.standard_normal((BOARD_SPOTS, N))) * rng.choice([-1, 1], N)
    spots = []
    for _ in range(BOARD_SPOTS):
        spot = ring(board(BOARD_HZ), contact_s=0.00026, detune=0.14)
        spot = spot - amp(-11.5) * ring(THUD_MODES, contact_s=0.00027)
        spots.append(spot + amp(-7.5) * ring(CLICK_MODES, detune=0.26))
    contacts = signal.fftconvolve(hail, spots, axes=1).sum(axis=0)[:N]
    return np.sqrt(power) * unit(contacts)


def taps():
    """Each blow rings the board and clicks the plastic; the board then thuds on the carpet."""
    out = np.zeros(N)
    for s, db, pitch_hz, thud_db, click_db in TAPS:
        at = s + TAP_LAG_S
        blow = ring(board(pitch_hz), detune=0.049)
        blow = blow + amp(click_db + 7.5) * ring(CLICK_MODES, contact_s=0.00037, detune=0.042)
        thud = ring(THUD_MODES, contact_s=0.0041, detune=0.029)
        add(out, at, amp(db - 3.5) * blow)
        add(out, at + THUD_LAG_S, -amp(db + thud_db + 1.0) * thud)
    return out


def snaps():
    """Dry bright snaps: short high modes, panned by level."""
    out = np.zeros((2, N))
    for s, db, pan_db in SNAPS:
        sides = amp([[pan_db / 2], [-pan_db / 2]])
        snap = ring(SNAP_MODES, contact_s=0.000067, detune=0.052)
        add(out, s + SNAP_LAG_S, amp(db + 7.5) * sides * snap)
    return out


def scrapes():
    """Claws scraping the board: broad noise swells."""
    return swells(SCRAPES, relative_width=0.56)


def knocks():
    """Shell modes shake the two ports against each other: opposite signs, plus a second ring on the right."""
    out = np.zeros((2, N))
    for s, db in KNOCKS:
        shake = ring(SHELL_MODES, contact_s=0.00066, detune=0.015) * np.array([[0.9], [-0.4]])
        extra = np.array([[0], [0.35]]) * ring(SHELL_MODES)
        add(out, s + KNOCK_LAG_S, amp(db + 8) * (shake + extra))
    return out


def pawn_rocking():
    """A hollow pawn rocking on its rim: one mode struck at each contact."""
    out = np.zeros(N)
    for s, db in PAWN_ROCKS:
        add(out, s, amp(db) * ring([(PAWN_HZ, 0, PAWN_T60_S)], contact_s=0.0013, detune=0.022))
    return out


def camcorder_bumps():
    """A hand shifts on the camcorder: low sines under Gaussian envelopes."""
    t = np.arange(N) / SR
    out = np.zeros(N)
    for s, hz, db, half_s in BUMPS:
        out += amp(db) * np.exp(-((t - s) / half_s) ** 2) * np.sin(2 * np.pi * hz * t)
    return np.sqrt(2) * out


def scene():
    """Bird and pieces with the room's answer; puffs, snaps, knocks and camcorder noise stay dry."""
    camcorder = camcorder_hum() + camcorder_drive() + camcorder_hiss() + camcorder_bumps()
    whistle = warble()
    rough = rasps() + slides_and_rattle() + taps() + scrapes() + pawn_rocking()
    sent = filtered(whistle, lambda hz: amp(along(WHISTLE_SEND, hz))) + rough
    answer = room(filtered(sent, lambda hz: amp(along(ROOM_STRENGTH, hz))))
    return camcorder + whistle + rough + answer + puffs() + snaps() + knocks()


def record(dry):
    """Two ports differing in level and phase, peaks softly rounded, then a sharp band limit."""
    def ports(hz):
        left_over_right = amp(along(PORT_LEVEL, hz)) * np.exp(1j * along(PORT_PHASE, hz))
        return left_over_right ** np.array([[0.5], [-0.5]])

    heard = filtered(dry, ports)
    rounded = heard / (1 + np.abs(heard / CEILING) ** 4) ** 0.25
    return filtered(rounded, lambda hz: hz < BAND_LIMIT_HZ)


dry = scene()
out = record(dry)
pcm_store(out)
```